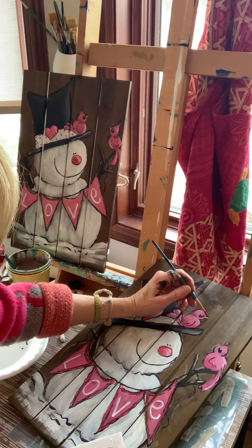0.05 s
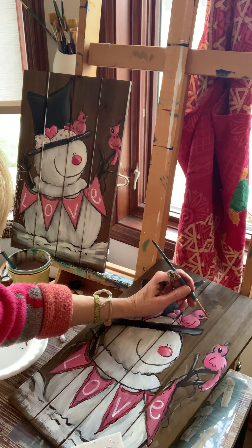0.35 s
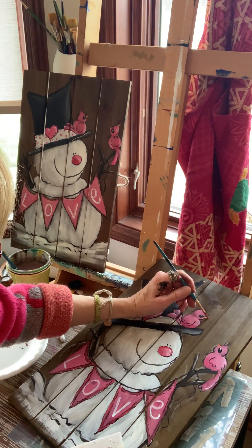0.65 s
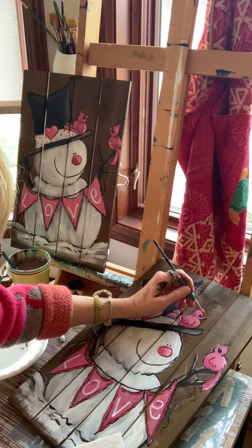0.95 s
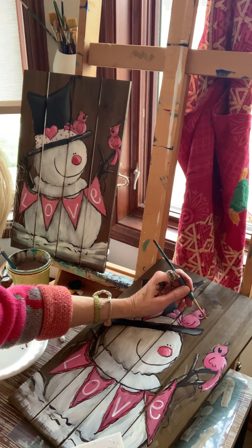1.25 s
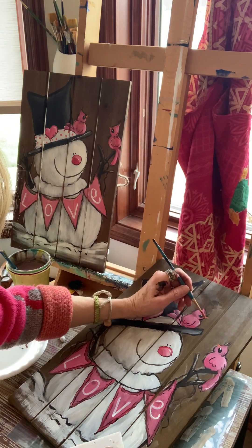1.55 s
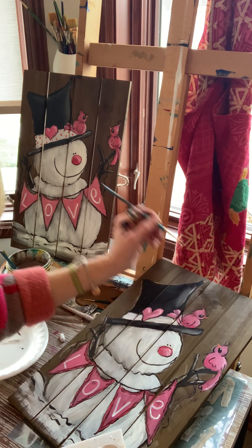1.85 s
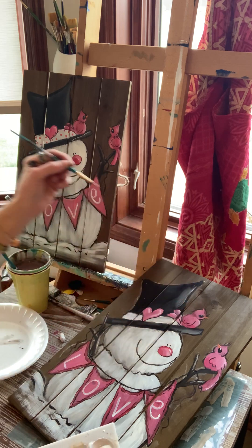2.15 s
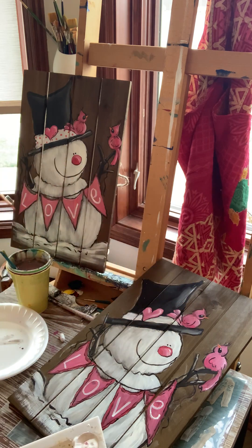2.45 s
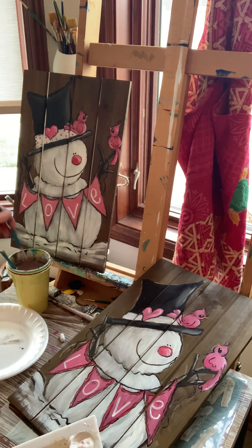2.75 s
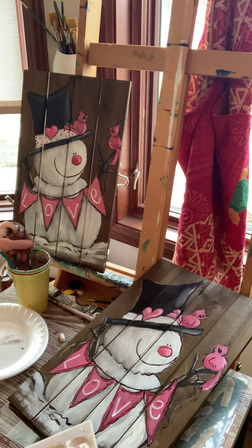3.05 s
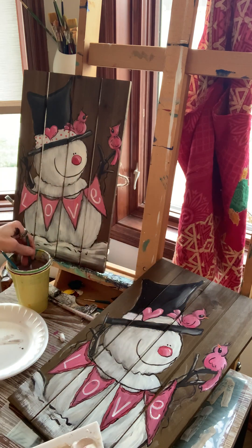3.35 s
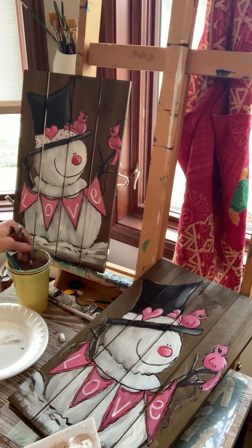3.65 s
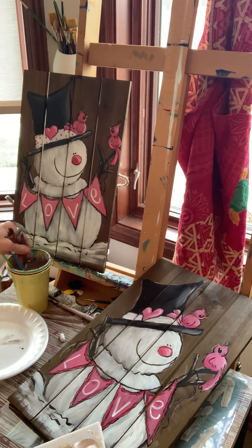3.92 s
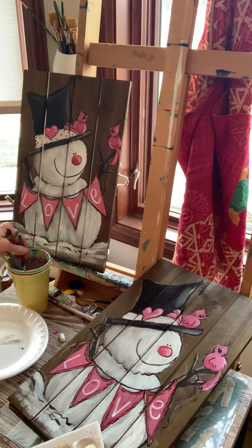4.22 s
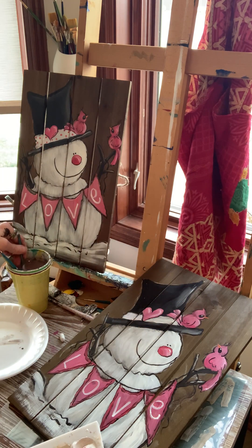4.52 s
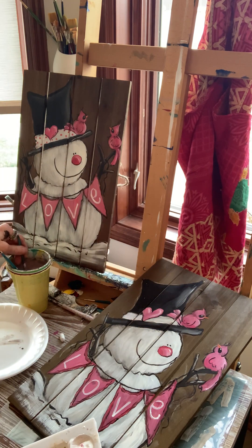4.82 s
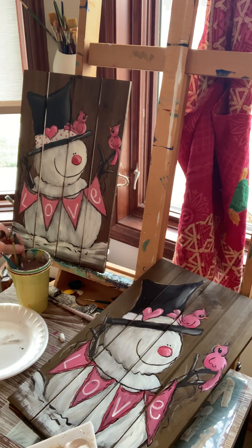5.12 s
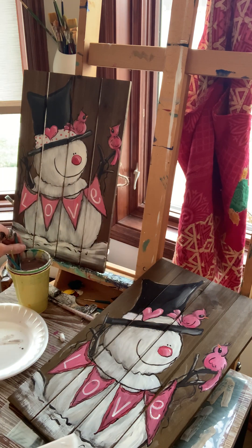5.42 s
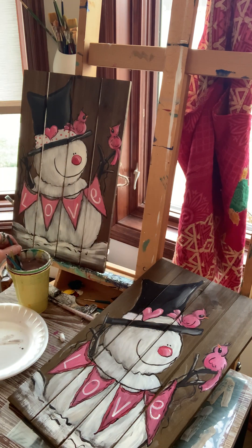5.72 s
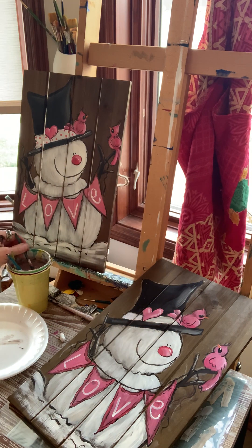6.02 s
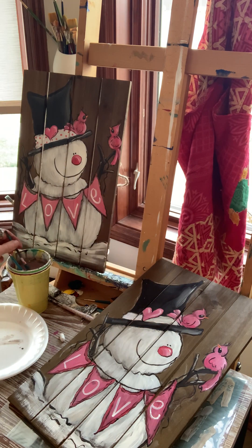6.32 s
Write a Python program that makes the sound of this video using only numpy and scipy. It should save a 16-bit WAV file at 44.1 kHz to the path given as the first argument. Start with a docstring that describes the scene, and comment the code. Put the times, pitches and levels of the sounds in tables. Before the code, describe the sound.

A paintbrush taps lightly, then clatters and sloshes in a cup of water in a small room with a low hum.

```python
"""A light tap and a few soft rustles, then the clatter and slosh of a paintbrush rinsed in a cup of water.
The handle taps the painting, then the brush swings about six times a second in the cup: it knocks on the
wall and clicks on the rim in between, while trapped air plops and the cup rings hollowly.
The wooden work table booms now and then. A small room with a low electric hum answers briefly,
heard in stereo at two close microphone ports."""
import sys
import numpy as np
from scipy import signal
from scipy.fft import rfft, irfft
from scipy.io import wavfile

SR = 44100
rng = np.random.default_rng(int(sys.argv[2]) if len(sys.argv) > 2 else 0)


def output_pcm(signal):
    """Save a mono or channel-first signal as 16-bit PCM at the path in sys.argv[1].

    Samples are clipped to [-1, 1] before scaling.
    """
    pcm = np.clip(np.atleast_2d(signal).T, -1, 1) * 32767
    wavfile.write(sys.argv[1], SR, np.round(pcm).astype(np.int16))


N = 285488
TIME, HZ = np.arange(N) / SR, np.fft.rfftfreq(N, 1 / SR)

# the brush hits the wall of the cup: t/s, strength/dB, thud/dB, tick/dB
KNOCKS = [(3.293, -58, -54.5, -58), (3.387, -50.5, -47, -52), (3.5536, -44, -43.5, -43.5),
          (3.7239, -52, -45.5, -58), (3.8913, -42, -40.5, -45), (4.0548, -43.5, -41.5, -41.5),
          (4.223, -50, -45, -52.5), (4.3766, -44.5, -41, -45.5), (4.4942, -56, -48.5, -51),
          (4.539, -45, -44, -52), (4.709, -42, -45.5, -44.5), (4.8816, -46, -47, -46.5),
          (4.958, -56, -49, -66), (5.335, -49, -45.5, -46.5), (6.358, -61.5, -57, -71.5)]
# tone of a dull thud: f/Hz, level/dB
THUD = [(90, -44), (200, -3.5), (280, 1), (430, 7.5), (520, 4.5), (700, 9.5), (1050, 8), (1300, 8),
        (2200, -27.5)]
# tone of a bright tick: f/Hz, level/dB
TICK = [(1800, -30), (3000, -10), (3900, -5), (4450, 0), (5600, -1), (6600, -3), (7700, -1), (9500, -6),
        (12000, -8), (14500, -15), (16500, -23)]


def knocks(clack_db=6.5, hardness=-2.5, rebound_s=.036, rebound_db=-24, scatter=.25):
    """Each swing lands on the wall of the cup; the springy brush rebounds once, more softly."""
    out = np.zeros(N)
    for (s, db, thud, tick), chance in zip(KNOCKS, rng.uniform(-1, 1, len(KNOCKS))):
        blow = thud, db + clack_db, tick, hardness
        add(out, s, contact(*blow))
        add(out, s + rebound_s * (1 + scatter * chance), gain_of(rebound_db) * contact(*blow))
    return out


def cracks(level_db=-4):
    """A very short crack of the stiff wall gives each knock its attack."""
    tone = [(1500, -16), (2700, 3), (3600, -24), (4900, 2), (5700, 7), (7000, -20.5), (12000, -64)]  # the wall's crack: f/Hz, level/dB
    out = np.zeros(N)
    for s, db, *_ in KNOCKS:
        add(out, s, gain_of(db + level_db) * strike(colour(tone), rise=.0003, decay=.0014, chatter=1.8))
    return out


def clicks(thud_db=-5.5, clack_db=5, tick_db=1):
    """The handle glances off the rim, hardly moving the wall."""
    touches = [(3.058, -57.5, -49, 1.5), (3.5348, -76, -58, 10), (3.5478, -46, -58, 8),
               (3.645, -60, -56.5, -1.5), (3.754, -56, -52.5, -8.5), (3.848, -68, -55.5, 7),
               (3.8733, -44.5, -49.5, 5), (3.939, -69, -49.5, -2.5), (4.189, -52, -50.5, -2),
               (4.252, -50.5, -53.5, -7.5), (4.298, -53.5, -48.5, 11), (4.362, -41.5, -44.5, -4),
               (4.577, -44.5, -56.5, -9), (4.657, -54.5, -54, 5), (4.7907, -56, -53, 2),
               (4.913, -49, -53.5, -6), (4.9985, -74, -50.5, 0.5), (5.051, -57, -59.5, -10.5),
               (5.159, -55.5, -54.5, -12), (5.273, -60.5, -53, -3.5), (5.3155, -67, -55, -8.5),
               (5.392, -60, -57, -15), (5.862, -66.5, -67.5, -1)]  # rim hits: t/s, clack/dB, tick/dB, hardness/(dB per octave)
    out = np.zeros(N)
    for s, clack, tick, hardness in touches:
        add(out, s, contact(tick + thud_db, clack + clack_db, tick + tick_db, hardness))
    return out


def contact(thud_db, clack_db, tick_db, hardness):
    """One hit in three layers: the wall's dull thud, the handle's clack and a sharp tick."""
    clack_tone = [(700, -28), (1150, -8), (1380, 1), (1850, -3.5), (2300, -4.5), (2950, -4), (3500, -16.5),
                  (6000, -57.5)]  # the wooden handle: f/Hz, level/dB
    thud = strike(colour(THUD), rise=.0065, decay=.0073, chatter=3.4)
    clack = strike(colour(clack_tone), rise=.0012, decay=.0058, chatter=2.1)
    tick = strike(tip(hardness), rise=.0004, decay=.0021, chatter=1.4)
    return gain_of(thud_db) * thud + gain_of(clack_db) * clack + gain_of(tick_db) * tick


def tip(hardness, count=30):
    """The ring of a tick: hardness tilts it in dB per octave, and each spot struck has its own colour."""
    hz = np.linspace(TICK[0][0], TICK[-1][0], count)
    uneven_db = 2.2 * rng.standard_normal(count)
    return colour(list(zip(hz, read(TICK, hz) + hardness * np.log2(hz / hz[0]) + uneven_db)))


def strike(ring, rise, decay, chatter):
    """An impulse and its chatter (rise, decay in s) excite a body; as much energy as 14 ms at rms 1."""
    t = np.arange(SR // 20) / SR
    force = rng.standard_normal(len(t)) * (1 - np.exp(-t / rise)) * np.exp(-t / decay)
    force *= chatter / np.linalg.norm(force)
    force[0] += 1
    sound = signal.fftconvolve(force, ring)
    return unit_rms(sound) * np.sqrt(.014 * SR / len(sound))


def plops(level_db=-3, rise_s=.0015, decay_s=.0023, sag_octaves=.135, sag_s=.0034):
    """Air pockets dragged under by the bristles ring briefly, sagging in pitch as they change shape."""
    pockets = [(3.468, 1684, -30), (3.553, 1642, -20), (3.6318, 1616, -32), (3.879, 1694, -25),
               (3.895, 1590, -31), (4.055, 1430, -24.5), (4.193, 2880, -32.5), (4.256, 2466, -32),
               (4.366, 1814, -27), (4.3788, 1440, -19.5), (4.495, 1830, -32.5), (4.541, 1767, -30),
               (4.705, 1460, -30), (4.711, 1440, -18.5), (4.884, 1903, -26.5), (5.054, 2000, -37),
               (5.163, 2845, -37.5), (5.2, 2610, -37.5)]  # large air pockets at their peak: t/s, f/Hz, level/dB
    out, lead_s = np.zeros(N), .01
    t = np.arange(SR // 12) / SR - lead_s
    sag = 2 ** (-sag_octaves * np.tanh(t / sag_s))
    envelope = np.exp(-(np.minimum(t, 0) / rise_s) ** 2 - np.maximum(t, 0) / decay_s)
    for s, hz, db in pockets:
        phase = 2 * np.pi * (np.cumsum(hz * sag) / SR + rng.random())
        add(out, s - lead_s, gain_of(db + level_db) * envelope * np.sin(phase))
    return out


def slosh(splash_db=-8, bubble_db=-10, surge_s=.033, surge_db=8):
    """Stirred water splashes finely and traps bubbles, surging up the wall after each knock."""
    stirring = [(3.2, -67), (3.4, -63), (3.7, -58.5), (3.95, -50.5), (4.15, -53.5), (4.46, -52),
                (4.65, -69), (4.899, -58), (5.1, -67), (5.499, -62.5)]  # how hard the water is stirred: t/s, level/dB
    tone = [(200, -6.5), (380, 8.5), (700, -8.5), (1500, 17), (2400, 14), (3100, 6.5), (4000, -13),
            (5800, -2.5), (8000, -9.5), (13000, -23), (16000, -21.5)]  # fine splashes: f/Hz, level/dB
    s, db = np.transpose(stirring)
    ages = [np.maximum(TIME - knock[0], 0) / surge_s for knock in KNOCKS]
    surge = sum(age * np.exp(1 - age) for age in ages)
    envelope = gain_of(np.interp(TIME, s, db) + surge_db * surge) * (TIME > s[0]) * (TIME < s[-1])
    splash = crackle(tone, per_s=1400, spread_db=6.5)
    return envelope * (gain_of(splash_db) * splash + gain_of(bubble_db) * bubbles())


def bubbles(per_s=170, low_hz=900, high_hz=2700, cycles=7, sizes=24):
    """Small bubbles ring briefly, each rising a little in pitch as it nears the surface; rms 1."""
    out, t = np.zeros(N), np.arange(SR // 25) / SR
    for hz in np.geomspace(low_hz, high_hz, sizes):
        age = hz * t / cycles
        ring = np.sin(2 * np.pi * hz * t * (1 + .012 * age)) * np.exp(-age)
        for s in rng.uniform(0, TIME[-1], rng.poisson(per_s * TIME[-1] / sizes)):
            add(out, s, rng.random() * ring)
    return unit_rms(out)


def spray(level_db=-21, rise_s=.008, fade_s=.013):
    """Each knock flings fine drops off the wet bristles; harder knocks spray louder."""
    bursts, t = np.zeros(N), np.arange(SR // 3) / SR
    for s, db, *_ in KNOCKS:
        add(bursts, s, gain_of(db + level_db) * (1 - np.exp(-t / rise_s)) * np.exp(-t / fade_s))
    return bursts * crackle(TICK, per_s=700, spread_db=4)


def cup_ring(x, t60_at_1khz_s=.32, damping=.5, skew_rad=.71):
    """The cup and the boards under it ring hollowly; each mode has its own phase at the left port."""
    modes = [(311, 10), (371, 9.5), (610, 3.5), (702, 2), (987, 2), (1068, 3), (1130, 2.5), (1406, 11),
             (1565, 1), (1830, 3), (2090, -1), (2890, 5)]  # hollow resonances: f/Hz, gain/dB
    t = np.arange(SR // 2) / SR
    ring = np.zeros((2, len(t)))
    for hz, db in modes:
        rate = np.log(1000) / t60_at_1khz_s * (hz / 1000) ** damping  # high modes die sooner
        phase = skew_rad * rng.standard_normal() * np.array([[1], [0]])
        ring += gain_of(db) * 2 * rate / SR * np.exp(-rate * t) * np.sin(2 * np.pi * hz * t + phase)
    return signal.fftconvolve(x[None], ring, axes=1)[:, :N]


def table_booms(swell_s=.024):
    """The table top swells into a low boom when the brush is pressed down."""
    booms = [(3.558, 117.6, -43), (3.631, 116.3, -44), (3.847, 119.6, -48), (4.056, 119.6, -45.5),
             (4.53, 268, -49.5), (4.735, 266, -48.5), (5.334, 269, -49.5)]  # low modes of the table top: t/s, f/Hz, level/dB
    out, t = np.zeros(N), np.arange(SR // 3) / SR
    envelope = t / swell_s * np.exp(1 - t / swell_s)
    for s, hz, db in booms:
        add(out, s, gain_of(db) * envelope * np.sin(2 * np.pi * hz * t))
    return out


def handle_tap(ring_db=7, tick_db=-7, thud_db=-8):
    """A light, crisp tap on the painting leaves the wooden handle ringing briefly."""
    taps = [(1.66, -57, -5.5)]  # handle on painting: t/s, level/dB, hardness/(dB per octave)
    modes = [(1220, -1, 0.13), (1911, 3.5, 0.054), (2600, 1.5, 0.045), (2930, -7, 0.022)]  # the free handle's ring: f/Hz, level/dB, t60/s
    out, t = np.zeros(N), np.arange(SR // 8) / SR
    ring = sum(gain_of(db - 60 * t / t60) * np.sin(2 * np.pi * hz * t) for hz, db, t60 in modes)
    for s, db, hardness in taps:
        add(out, s, gain_of(db + ring_db) * strike(ring, rise=.0032, decay=.023, chatter=.76))
        add(out, s, gain_of(db + tick_db) * strike(tip(hardness), rise=.00028, decay=.0026, chatter=2.5))
        add(out, s, gain_of(db + thud_db) * strike(colour(THUD), rise=.0018, decay=.019, chatter=2.6))
    return out


def rustles(squeak_db=-13, squeak_hz=(6400, 12600), width_hz=250, glide_octaves_per_s=3.1):
    """Soft grainy swells of hiss, one leading into a knock; each carries two thin, sliding squeaks."""
    swells = [(2.372, 0.0076, -68.5), (2.525, 0.016, -69), (2.704, 0.012, -68), (2.876, 0.013, -67.5),
              (4.864, 0.023, -57.5), (5.999, 0.038, -72.5), (6.115, 0.047, -69.5)]  # soft swells: t/s, half-width/s, level/dB
    tone = [(1500, 7.5), (3200, 7.5), (4500, -8), (6000, 5.5), (7200, -8.5), (12000, -13), (16500, -8)]  # their scratchy grain: f/Hz, level/dB
    out, t = np.zeros(N), np.arange(-SR // 8, SR // 8) / SR
    scratch = crackle(tone, per_s=600, spread_db=4)
    pole = np.exp(-np.pi * width_hz / SR)
    for s, half_width, db in swells:
        sound = scratch[round((s + t[0]) * SR):][:len(t)]
        for _ in range(2):
            hz = rng.uniform(*squeak_hz) * 2 ** (glide_octaves_per_s * rng.uniform(-1, 1) * t)
            flutter = signal.lfilter([1], [1, -pole], rng.standard_normal(len(t)))
            squeak = unit_rms(flutter * np.sin(2 * np.pi * np.cumsum(hz) / SR))
            sound = sound + gain_of(squeak_db) * squeak
        add(out, s + t[0], gain_of(db) * np.exp(-(t / half_width) ** 2) * sound)
    return out


def sleeve(at_s=2, half_width_s=.02, level_db=-64.5):
    """The sleeve sweeps off the board in one soft, dull scrape."""
    tone = [(1000, -6), (2200, 11), (3400, 0), (4800, -11), (12000, -33)]  # cloth on wood: f/Hz, level/dB
    envelope = np.exp(-((TIME - at_s) / half_width_s) ** 2)
    return gain_of(level_db) * envelope * crackle(tone, per_s=830, spread_db=-2)


def smooth_room(x, cycle_hz=1.9, count=5):
    """Several echo patterns crossfade so the room's tail stays smooth, without a fixed ring."""
    fades = np.array([np.cos(np.pi * (cycle_hz * TIME + k / count)) ** 6 for k in range(count)])
    return sum(room(x * fade) for fade in fades / np.linalg.norm(fades, axis=0))


def room(x, first_echo_s=.0015, echoes_per_s=3000):
    """The small room returns sparse echoes that die away band by band."""
    decay = [(100, 0.64), (400, 0.84), (1500, 0.24), (5000, 0.3), (15000, 0.16)]  # reverb time: f/Hz, t60/s
    tone = [(150, 4), (700, -1), (1500, -1), (2600, -3.5), (5000, -6), (12000, -4.5)]  # reverb against the direct sound: f/Hz, level/dB
    t = np.arange(SR) / SR
    signs = rng.choice([-1., 1.], (2, SR))
    echoes = signs * (rng.random((2, SR)) < echoes_per_s / SR) * (t > first_echo_s)
    hz, t, spectra = signal.stft(echoes, SR, nperseg=256)
    t60, hz = read(decay, hz)[:, None], hz[:, None]
    field = diffuse(spectra, hz, aimed_hz=2100, steepness=3, aimed_share=.9)
    unit_energy = np.sqrt(np.log(10 ** 6) / t60 / np.sum(echoes[0] ** 2))
    tail = field * gain_of(read(tone, hz) - 60 * t / t60) * unit_energy
    return signal.fftconvolve(x[1:], signal.istft(tail, SR, nperseg=256)[1], axes=1)[:, :N]


def ventilation(level_db=-57):
    """A steady bed of dull air noise fills the room."""
    tone = [(20, -48), (45, -20.5), (75, 1.5), (140, 2.5), (230, -2), (420, -6.5), (700, -8.5), (1300, -12),
            (2000, -11.5), (2600, -24.5), (3300, -37), (4300, -46.5), (9000, -50.5), (13000, -49),
            (15000, -60.5)]  # moving air: f/Hz, level/dB
    balance = [(400, 1), (850, 2), (1900, 3.5), (2500, -10), (3800, 0)]  # its stereo lean: f/Hz, left minus right/dB
    noise = rfft(rng.standard_normal((2, N)))
    field = diffuse(noise, HZ, aimed_hz=2700, steepness=9, aimed_share=.89)
    pan = gain_of(np.outer([.5, -.5], read(balance, HZ)))
    return gain_of(level_db) * unit_rms(irfft(field * gain_of(read(tone, HZ)) * pan, N))


def hum():
    """Mains hum, fan tones and the room's low resonances drone and waver."""
    tones = [(58.75, -62.5, 4, 0.87), (102, -66, 5, 2), (119.7, -59.5, 6.7, 0.24), (202.7, -66.5, 12, 1.6),
             (261, -69, 7, 1.1), (403.4, -71, 2.7, 0.55), (519.7, -73.5, 24, 0.67)]  # drone tones: f/Hz, level/dB, waver width/Hz, waver amount
    out = np.zeros(N)
    for hz, db, width, amount in tones:
        band = np.exp(-((HZ - hz) / width) ** 2)
        waver = unit_rms(irfft(rfft(rng.standard_normal(N)) * band, N))
        out += gain_of(db) * unit_rms(np.sin(2 * np.pi * (hz * TIME + rng.random())) + amount * waver)
    return out


def ports(x):
    """Sound from the cup's side reaches the two ports with different phase and level."""
    side = cup_side(HZ)
    return irfft(rfft(x) * np.array([side, np.ones(len(HZ))]) / np.sqrt(abs(side)), N)


def cup_side(hz):
    """The left port's response to the cup, relative to the right port's."""
    left_port = [(0, 0, 0), (450, 0, -2), (800, 1.1, 2), (1100, .9, 0), (1280, 3, 8), (1650, 4.7, 1),
                 (1900, 6.2, 0), (2250, 8.5, -2), (2600, 9.6, -4), (3200, 10.3, -2), (4200, 9.6, 0),
                 (9200, 6.6, 0), (11000, 6.1, 0), (15000, 3.4, 0)]  # left against right: f/Hz, phase lead/rad, level/dB
    f, lead, db = np.transpose(left_port)
    return gain_of(np.interp(hz, f, db)) * np.exp(1j * np.interp(hz, f, lead))


def diffuse(spectra, hz, aimed_hz, steepness, aimed_share, alike=.92, port_travel_s=.00079):
    """Two unrelated spectra become a field: all around in the bass, from the cup's side in the treble."""
    coherence = alike * np.sinc(2 * hz * port_travel_s)
    right = coherence * spectra[0] + np.sqrt(1 - coherence ** 2) * spectra[1]
    aimed = aimed_share / (1 + (aimed_hz / (hz + 1)) ** steepness)
    left = np.sqrt(1 - aimed) * spectra[0] + np.sqrt(aimed) * right * cup_side(hz)
    return np.array([left, right])


def crackle(spectrum, per_s, spread_db):
    """A crowd of tiny clicks of uneven size; rms 1."""
    size = gain_of(spread_db * np.minimum(rng.exponential(1, N), 4)) * rng.choice([-1, 1], N)
    grains = size * (rng.random(N) < per_s / SR)
    return unit_rms(signal.oaconvolve(grains, colour(spectrum))[:N])


def colour(points, size=2048):
    """The minimum-phase ring of a body with this spectrum."""
    log_gain = np.log(gain_of(read(points, abs(np.fft.fftfreq(size, 1 / SR)))))
    return np.fft.ifft(np.exp(np.conj(signal.hilbert(log_gain)))).real[:size // 2]


def read(points, hz):
    """A curve of straight lines on a log-frequency axis."""
    f, value = np.transpose(points)
    return np.interp(np.log(hz + 1), np.log(f + 1), value)


def gain_of(db):
    return 10 ** (np.asarray(db) / 20)


def unit_rms(x):
    return x / np.sqrt(np.mean(x ** 2) + 1e-20)


def add(mix, s, sound):
    part = mix[max(round(s * SR), 0):][:len(sound)]
    part += sound[:len(part)]


def scene(plop_send_db=-4, tap_send_db=-7):
    """Brush and water up close, with their echoes, the table and the room tone behind."""
    brush = knocks() + cracks() + clicks() + slosh()
    handle = ports(handle_tap())
    water = plops()
    near = ports(brush + spray() + rustles() + sleeve())
    echoes = smooth_room(near + gain_of(plop_send_db) * water + gain_of(tap_send_db) * handle)
    cup = ports(water + cup_ring(brush + water))
    return near + handle + cup + echoes + table_booms() + ventilation() + hum()


def record(dry):
    """A steep low-pass trims the very top of the treble."""
    low_pass = signal.firwin(511, cutoff=16400, window=("kaiser", 9), fs=SR)
    return signal.oaconvolve(dry, low_pass[None], "same")


dry = scene()
out = record(dry)
output_pcm(out)
```